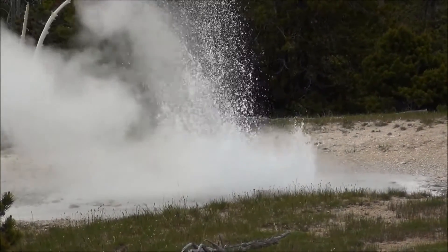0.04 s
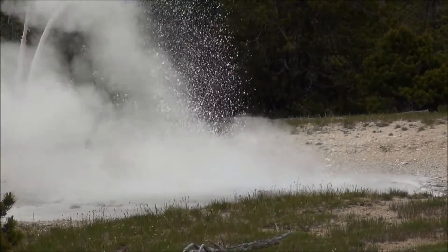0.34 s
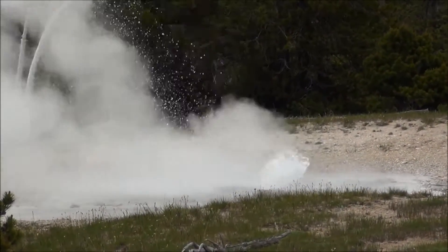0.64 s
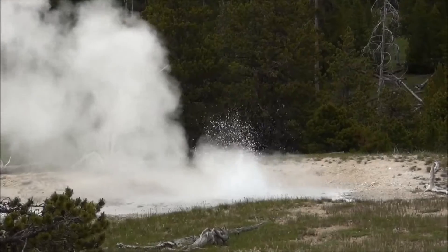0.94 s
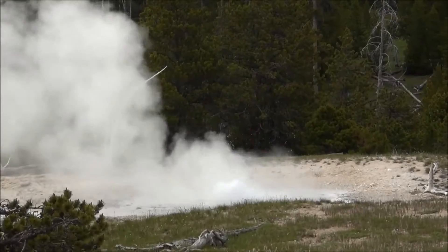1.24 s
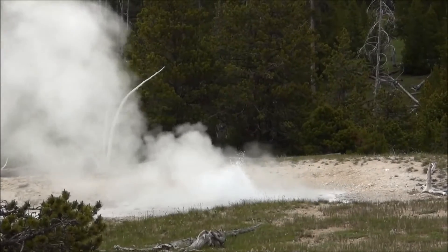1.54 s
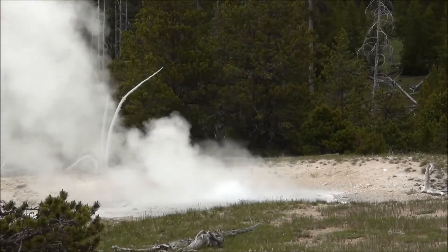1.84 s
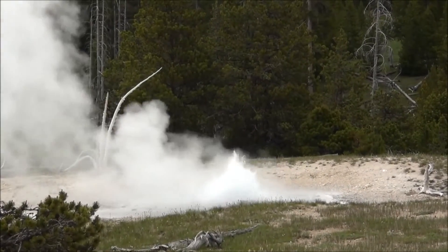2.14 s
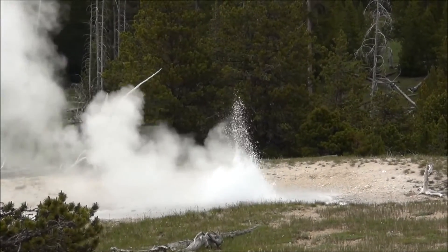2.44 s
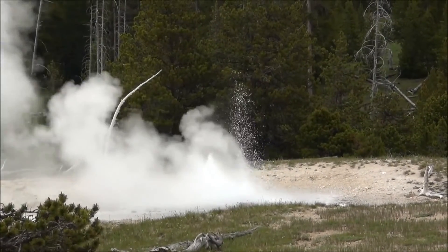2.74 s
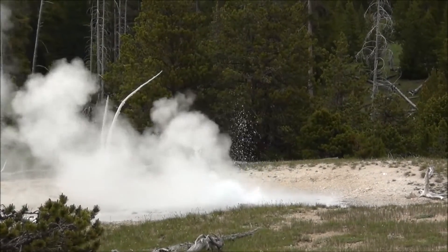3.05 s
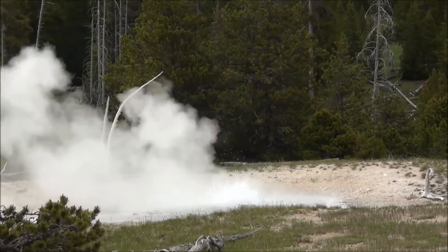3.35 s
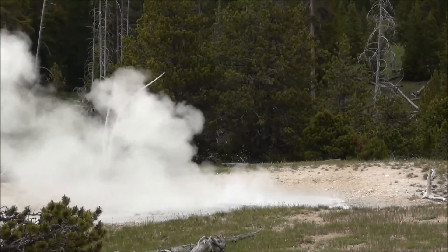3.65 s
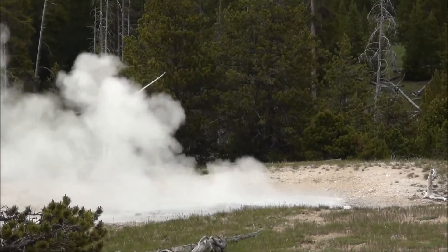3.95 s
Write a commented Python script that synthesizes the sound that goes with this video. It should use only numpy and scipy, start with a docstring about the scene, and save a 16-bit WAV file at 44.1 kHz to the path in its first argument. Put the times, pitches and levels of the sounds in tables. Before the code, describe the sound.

A geyser's rush of steam and boiling water fades in and holds, hissing with spray.

```python
"""A far bird chirps twice over the faint rush of a geyser across a meadow. This first view fades to silence; a
second fades in slowly and holds a loud roar, with a hissing jet of spray and a late surge. Water rolling in the
shaft and boiling in the vent gives the low bands of turbulent noise, steam tearing through water the middle,
and spray the top. Drops and small splashes ring as damped oscillators, and larger lumps of water slap down."""
import sys
import numpy as np
from scipy import signal
from scipy.fft import rfft, irfft
from scipy.io import wavfile

SR = 44100
rng = np.random.default_rng(int(sys.argv[2]) if len(sys.argv) > 2 else 0)


def wav_record(signal):
    """Record a signal, one row per channel, as 16-bit PCM in the file named by sys.argv[1]."""
    frames = np.transpose(np.atleast_2d(signal))
    bounded = np.clip(frames, -1, 1)
    # unit amplitude maps onto the largest positive 16-bit level
    quanta = np.round(bounded * 32767).astype(np.int16)
    wavfile.write(sys.argv[1], SR, quanta)


N = 176400
TIME = np.arange(N) / SR
HZ = np.fft.rfftfreq(N, 1 / SR)

# bird chirps: t/s, duration/s, level/dB, starting f/Hz, f/Hz when loudest, final f/Hz
CHIRPS = [(0.0, 0.0457, -54, 2890, 2760, 2450), (.155, 0.128, -53.5, 2750, 3030, 2820)]
# envelopes of the geyser's four bands, before the fades: t/s, level/dB
RUMBLE_LEVEL = [(0, -63.5), (0.64, -60.5), (0.76, -51), (1.02, -46), (1.2, -52.5), (1.55, -50.5),
                (1.85, -54.5), (2.1, -49.5), (2.65, -54), (3.15, -47.5), (3.6, -48), (4.0, -52)]
BOIL_LEVEL = [(0, -57), (0.23, -56), (0.4, -50), (0.64, -57), (0.76, -40.5), (1.02, -38), (1.2, -40.5),
              (1.52, -37.5), (1.77, -41.5), (2.13, -39.5), (2.28, -41), (2.55, -41.5), (2.77, -40),
              (2.98, -41.5), (3.45, -41), (3.6, -40), (3.85, -43.5), (4.0, -42)]
RUSH_LEVEL = [(0, -50.5), (0.19, -48.5), (0.42, -46), (0.64, -50.5), (0.76, -35), (0.9, -31.5),
              (1.15, -32.5), (1.53, -32.5), (1.75, -33), (2.26, -32), (2.6, -33), (2.78, -33.2),
              (2.97, -32), (3.1, -32), (3.45, -32.5), (3.6, -31), (3.86, -33.5), (4.0, -33)]
SPRAY_LEVEL = [(0, -63.5), (0.25, -60.5), (0.64, -63), (0.76, -51), (0.92, -46.5), (1.75, -48.5),
               (2.2, -46.5), (2.53, -45), (2.63, -43.5), (2.72, -45.5), (2.95, -44), (3.3, -47),
               (3.6, -45.5), (4.0, -46.5)]
# spectral envelope of the geyser in each view: f/Hz, relative level/dB
FIRST_SPECTRUM = [(24, -54), (40, -21), (64, -22), (80, -15), (213, -4), (350, 0), (377, -1.5), (740, -6.5),
                  (1490, -6.5), (2710, -10.5), (2920, -11), (3390, -11), (9650, -25), (12400, -28.5),
                  (15500, -45)]
SECOND_SPECTRUM = [(18, -56), (30, -29.5), (97, -13.5), (249, -2), (307, -3.5), (389, -0.5), (532, -4.5),
                   (874, 0), (1170, -5), (1400, -0.75), (1720, -5), (2300, -4.5), (2830, -7), (3490, -7),
                   (8280, -20), (11900, -19.5), (12900, -21), (15500, -42)]
# direct sound, right channel relative to left: f/Hz, level/dB
RIGHT_BIAS = [(60, 2), (130, 0.5), (270, -0.5), (450, 1.7), (740, 2), (1250, 3.5), (2100, 5), (3400, 4),
              (5500, 3.5), (8500, 0)]
# scattered sound relative to direct sound: f/Hz, level/dB
SCATTER = [(60, -19), (150, -31), (330, -39), (700, -19.5), (1400, -17.5), (2800, -13.5), (5500, -10.5),
           (8000, -6.5)]
# hollow swells of the vent: centre t/s, spread/s, level/dB, f/Hz, half-width/Hz
SURGES = [(0.037, 0.047, -56.5, 233, 45), (2.2, 0.63, -45.5, 977, 110), (2.517, 0.18, -44.5, 268, 55),
          (2.973, 0.024, -37, 2100, 1500), (3.569, 0.062, -35.5, 3070, 1700), (3.598, 0.035, -36, 850, 130)]
# spurts of the tall jet: centre t/s, spread/s, level/dB
SPURTS = [(2.28, .05, -59.5), (2.598, 0.087, -55), (2.88, .16, -57)]
# impacts of falling water: t/s, level/dB, centre f/Hz
SLAPS = [(2.296, -30, 3000), (3.018, -39, 12000), (3.172, -37.5, 14000), (3.789, -28.5, 5700)]

RUMBLE_TOP_HZ, BOIL_TOP_HZ, SPRAY_BOTTOM_HZ = 168.4, 522, 7300
SILENCE_START_S, SILENCE_END_S = .639, .770


def amp(db):
    """Amplitude ratio of a level in decibels."""
    return 10 ** (np.asarray(db) / 20)


def unit(x):
    """Normalisation to unit rms."""
    return x / np.sqrt(np.mean(x ** 2) + 1e-20)


def response(points):
    """Gain at each frequency, interpolated in decibels on a logarithmic axis."""
    hz, db = np.transpose(points)
    return amp(np.interp(np.log(HZ + 1), np.log(hz + 1), db))


def envelope(points):
    """Gain at each instant, interpolated in decibels."""
    return amp(np.interp(TIME, *np.transpose(points)))


def add(mix, start_s, sound):
    """Superposition of a sound on the mix from a given time."""
    part = mix[max(round(start_s * SR), 0):][:len(sound)]
    part += sound[:len(part)]


def below(edge_hz, order=8):
    """Power response of a low-pass filter."""
    return 1 / (1 + (HZ / edge_hz) ** order)


def resonance(hz, half_width_hz):
    """Lorentzian resonance curve, used as a gain."""
    return 1 / (1 + ((HZ - hz) / half_width_hz) ** 2)


def swell(centre_s, spread_s):
    """Gaussian rise and fall about a moment."""
    return np.exp(-.5 * ((TIME - centre_s) / spread_s) ** 2)


def wander(rate_hz):
    """Random modulation of unit rms, strongest near the given rate."""
    ratio = HZ / rate_hz
    return unit(irfft(rfft(rng.standard_normal(N)) * ratio / (1 + ratio ** 3), N))


def droplets(per_s, low_hz, high_hz, cycles, spread_db, pitches=24):
    """Damped oscillation: drops ring at random with rising pitch, most weakly, a few strongly."""
    out = np.zeros(N)
    for hz in np.geomspace(low_hz, min(high_hz, SR / 3), pitches):
        turns = np.arange(SR // 10) * hz / SR
        age = turns / cycles
        phase = 2 * np.pi * turns * (1 + 0.05 * np.minimum(age, 2))
        ring = np.sin(phase) * np.exp(-2 * age) * (1 - np.exp(-2 * turns))
        size = amp(spread_db * np.minimum(rng.exponential(1, N), 4)) * rng.choice([-1, 1], N)
        onsets = rng.random(N) < per_s / pitches / SR
        out += signal.oaconvolve(size * onsets, unit(ring) * np.sqrt(hz))[:N]
    return unit(out)


def radiate(drive, band, mono_above_hz=8670):
    """Source and filter: a band of flow noise takes each view's spectrum; scattering widens it in stereo."""
    mid = rfft(drive)
    right_gain = response(RIGHT_BIAS)
    scattered = rfft(rng.standard_normal(N)) * response(SCATTER)
    side = mid * (1 - right_gain) / (1 + right_gain) + scattered
    side *= np.sqrt(below(mono_above_hz, order=30))
    pair = np.array([mid + side, mid - side]) * band
    first = irfft(pair * response(FIRST_SPECTRUM), N)
    second = irfft(pair * response(SECOND_SPECTRUM), N)
    return np.where(TIME < SILENCE_START_S, first / first.mean(0).std(), second / second.mean(0).std())


def bird(rise_share=.27):
    """Frequency modulation: each thin whistle is a pure tone that glides as it swells and dies."""
    out = np.zeros(N)
    knots = [0, rise_share, 1]
    for start_s, duration_s, db, *pitch_hz in CHIRPS:
        progress = np.linspace(0, 1, int(duration_s * SR))
        phase = 2 * np.pi * np.cumsum(np.interp(progress, knots, pitch_hz)) / SR
        add(out, start_s, amp(db) * np.interp(progress, knots, [0, 1, 0]) * np.sin(phase))
    return out


def forest(direct, echo_db=-2, decay_s=.04):
    """Reverberation: scattering from trees gives a far sound a short exponential tail."""
    t = TIME[:SR // 2]
    tail = rng.standard_normal((2, len(t))) * np.exp(-t / decay_s)
    tail /= np.linalg.norm(tail[0])
    return direct + amp(echo_db) * signal.oaconvolve(direct[None], tail, axes=1)[:, :N]


def rumble(heave_db=1):
    """Low-frequency flow noise: water rolls deep in the shaft."""
    noise = radiate(rng.standard_normal(N), np.sqrt(below(RUMBLE_TOP_HZ)))
    return noise * envelope(RUMBLE_LEVEL) * amp(heave_db * wander(rate_hz=8.8))


def boil(heave_db=1.06):
    """Turbulence: boiling water heaves in the vent, modulating a low band of noise."""
    band = np.sqrt((1 - below(RUMBLE_TOP_HZ)) * below(BOIL_TOP_HZ))
    noise = radiate(rng.standard_normal(N), band)
    return noise * envelope(BOIL_LEVEL) * amp(heave_db * wander(rate_hz=11))


def rush(splash_db=-9, gust_db=0.26, sputter_db=0.22):
    """Two-phase flow: steam tears through water in a broadband roar full of small splashes."""
    splashes = droplets(per_s=4000, low_hz=543, high_hz=7220, cycles=4.34, spread_db=2.5)
    drive = unit(rng.standard_normal(N) + amp(splash_db) * splashes)
    band = np.sqrt((1 - below(BOIL_TOP_HZ)) * below(SPRAY_BOTTOM_HZ))
    roar = radiate(drive, band) * envelope(RUSH_LEVEL)
    return roar * amp(gust_db * wander(rate_hz=4.7) + sputter_db * wander(rate_hz=73))


def spray(drops_db=-8, flutter_db=0.2):
    """Incoherent addition: droplets pattering on the wet crust merge with a fine hiss."""
    drops = droplets(per_s=4500, low_hz=6400, high_hz=14000, cycles=1.8, spread_db=4.0)
    drive = unit(rng.standard_normal(N) + amp(drops_db) * drops)
    hiss = radiate(drive, np.sqrt(1 - below(SPRAY_BOTTOM_HZ)))
    return hiss * envelope(SPRAY_LEVEL) * amp(flutter_db * wander(rate_hz=25))


def surges():
    """Resonance: gusts of steam excite the vent, which answers with a hollow whoosh."""
    return sum(radiate(rng.standard_normal(N), resonance(hz, half_width_hz))
               * amp(db) * swell(centre_s, spread_s)
               for centre_s, spread_s, db, hz, half_width_hz in SURGES)


def jet(drops_db=-3):
    """Atomisation: a thin jet shoots up in spurts and breaks into a high fizz of tiny drops."""
    drops = droplets(per_s=2500, low_hz=11170, high_hz=14500, cycles=3, spread_db=3.0)
    drive = rng.standard_normal(N) + amp(drops_db) * drops
    fizz = unit(irfft(rfft(drive) * resonance(hz=14300, half_width_hz=2400) ** 2, N))
    return fizz * sum(amp(db) * swell(centre_s, spread_s) for centre_s, spread_s, db in SPURTS)


def slaps(rise_s=.0003, crack_decay_s=.0012, splash_decay_s=.025, splash_db=-17, spread_octaves=.3):
    """Impact transients: lumps of water land with a crack and a weaker, slower splash."""
    out, t = np.zeros(N), TIME[:4096]
    octave = np.log2(np.fft.rfftfreq(len(t), 1 / SR) + 1)
    attack = 1 - np.exp(-t / rise_s)
    decay = np.exp(-t / crack_decay_s) + amp(splash_db) * np.exp(-t / splash_decay_s)
    for start_s, db, hz in SLAPS:
        band = np.exp(-.5 * ((octave - np.log2(hz)) / spread_octaves) ** 2)
        noise = unit(irfft(rfft(rng.standard_normal(len(t))) * band))
        add(out, start_s, amp(db) * noise * attack * decay)
    return out


def scene():
    """Superposition: the pressures of the bird and the geyser's sources add."""
    return forest(bird()) + rumble() + boil() + rush() + spray() + surges() + jet() + slaps()


def record(dry):
    """Amplitude shaping and band limiting: two linear fades with a silence between, then a low-pass."""
    fade_out = np.interp(TIME, [0, 0.7], [1, 0]) * (TIME < SILENCE_START_S)
    fade_in = np.interp(TIME, [0.71, 2.113], [0, 1]) * (TIME > SILENCE_END_S)
    low_pass = signal.firwin(511, cutoff=15700, window=("kaiser", 9), fs=SR)
    return signal.oaconvolve(dry * (fade_out + fade_in), low_pass[None], "same")


dry = scene()
out = record(dry)
wav_record(out)
```